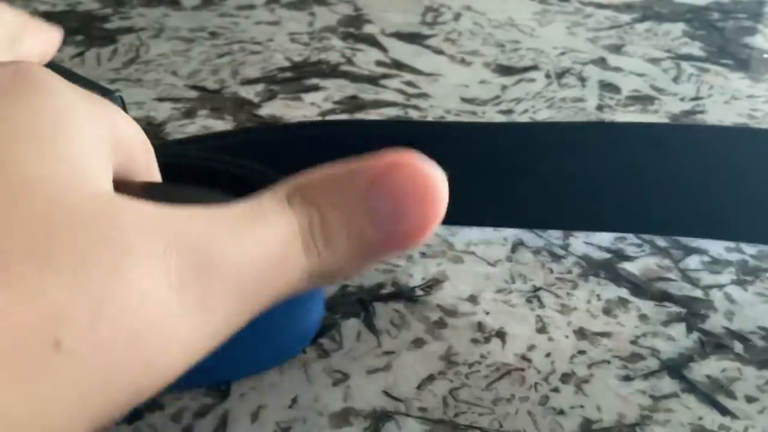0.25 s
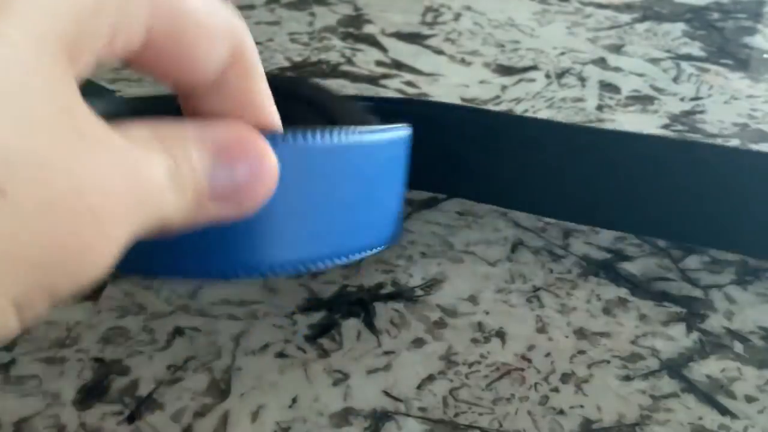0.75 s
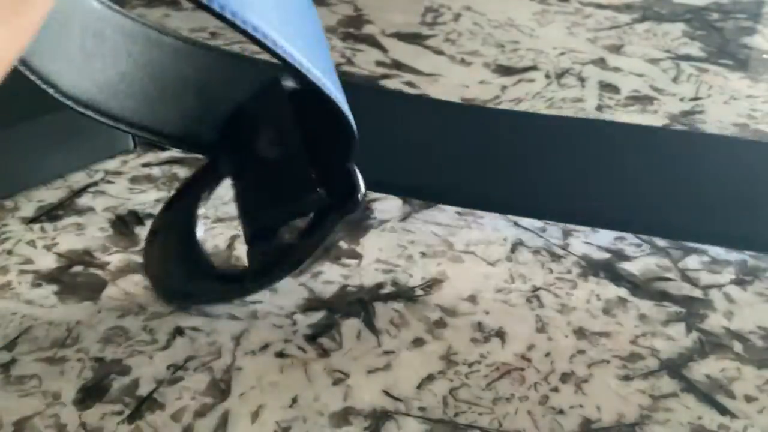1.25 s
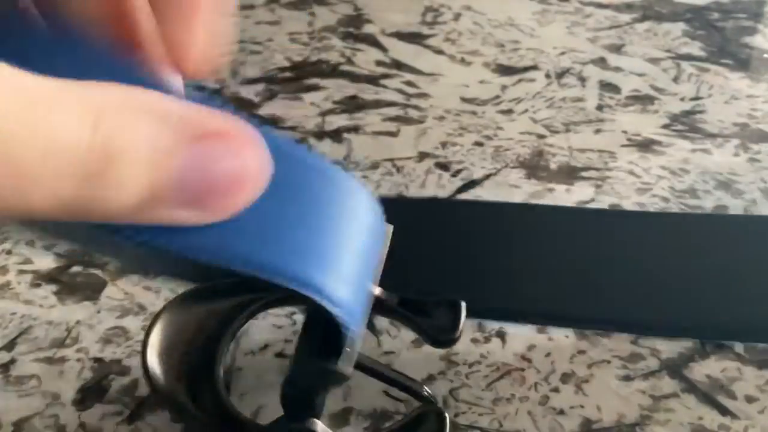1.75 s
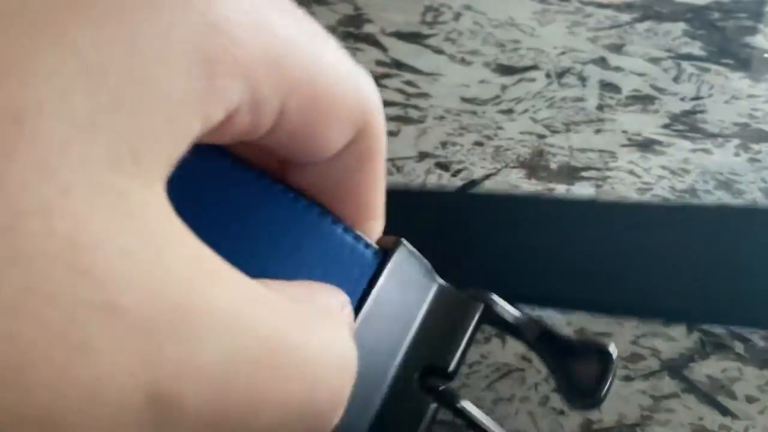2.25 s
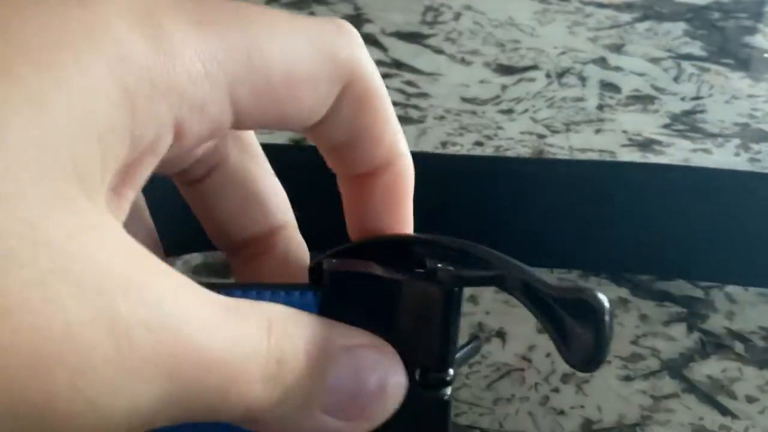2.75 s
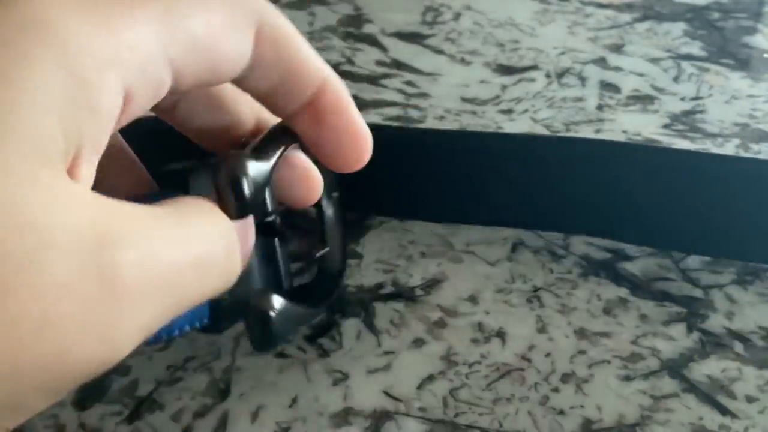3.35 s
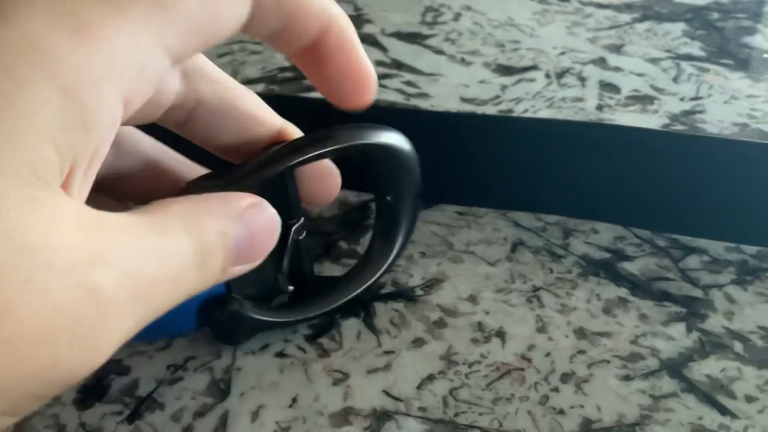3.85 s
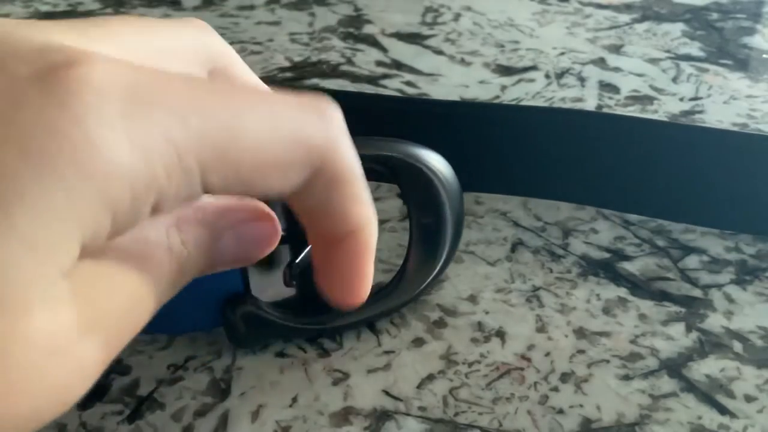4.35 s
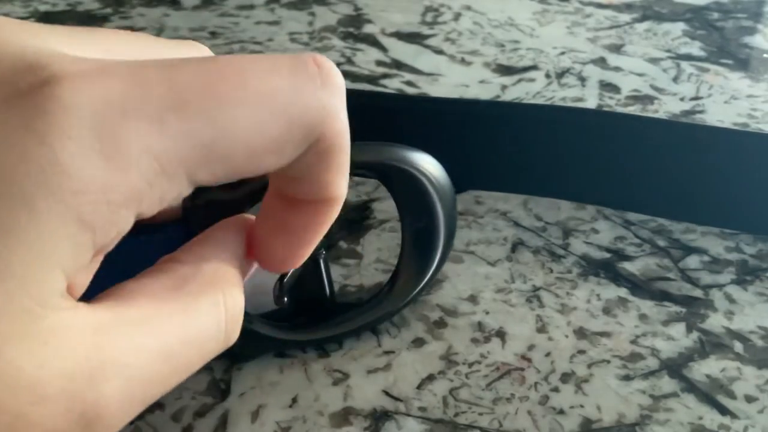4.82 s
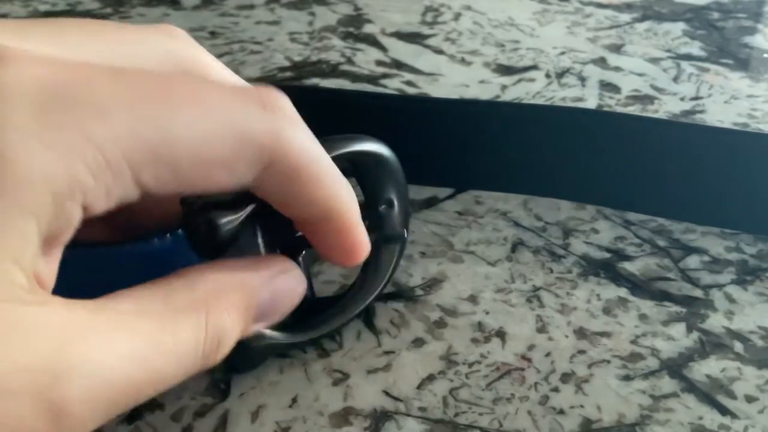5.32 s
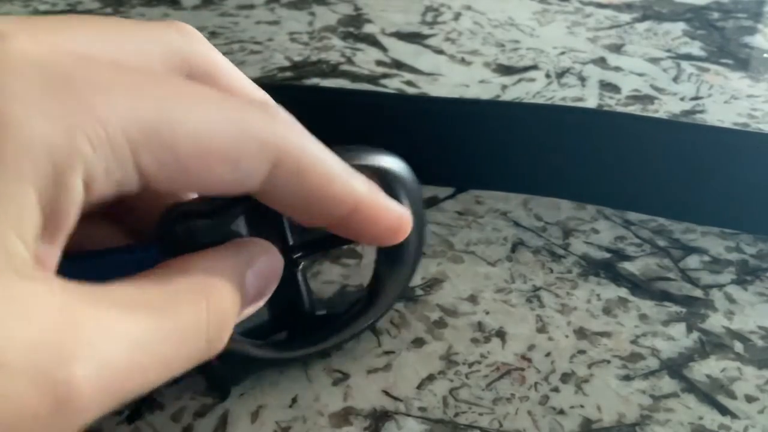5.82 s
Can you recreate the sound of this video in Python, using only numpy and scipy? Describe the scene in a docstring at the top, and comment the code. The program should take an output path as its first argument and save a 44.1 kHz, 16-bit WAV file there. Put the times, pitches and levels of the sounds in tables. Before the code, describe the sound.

Close up in a small, hard indoor room, hands uncoil a belt on a stone counter. Soft strap rustle leads to a quick cluster of buckle knocks, small hinge squeaks, then the loudest bright clacks and clinks. More separate hits and a rattling flurry follow before the handling thins to faint clicks over low ventilation.

```python
"""Stone countertop in a small hard room: hands uncoil a belt and turn its metal buckle over, close by.
Buckle blows and taps are noise bursts plus decaying modes; hinged parts clink and loose parts ping.
Hand and strap bump as band noise, the strap hisses as filtered noise and the stiff hinge chirps.
A diffuse tail with standing waves answers over steady ventilation noise and a faint tone."""
import sys
import numpy as np
from scipy import signal
from scipy.fft import rfft, irfft
from scipy.io import wavfile
from scipy.ndimage import uniform_filter1d, minimum_filter1d

SR = 44100
rng = np.random.default_rng(int(sys.argv[2]) if len(sys.argv) > 2 else 0)


def pcm_store(signal):
    """Save signal as 16-bit PCM."""
    levels = np.round(np.clip(np.atleast_2d(signal), -1, 1) * 32767)
    wavfile.write(sys.argv[1], SR, levels.astype(np.int16).T)


N = 268260

# buckle modes: part (0 frame low, 1 frame high, 2 crossbar, 3 hinged clamp), f/Hz, relative level/dB,
# nominal t60/s
BUCKLE_MODES = [(0, 2790, -14, .03), (0, 4410, 3, .026), (0, 4570, 4, .026), (0, 4750, -4, .075),
                (0, 5790, -8, .035), (0, 6030, -6, .03), (0, 6260, -7, .03), (0, 6745, 10, .035),
                (0, 6995, -1, .03), (0, 7280, -1, .028), (1, 8740, 4, .035), (1, 11280, 10, .033),
                (1, 12710, 6, .045), (1, 15380, -7, .04), (1, 10830, -2, .028), (1, 13060, -7, .025),
                (1, 14450, -8, .025), (2, 8710, 7, .075), (2, 8690, -17, .3), (2, 12690, -8, .15),
                (2, 4860, -14, .25), (3, 7655, 6, .11), (3, 10480, 9, .15), (3, 11350, -1, .08),
                (3, 15420, -3, .14)]
CLACK_SHARE = 0.62  # share of a light contact's bass weight that reaches the mids


def amp(db):
    """Amplitude ratio from dB."""
    return 10 ** (np.asarray(db) / 20)


def unit(x):
    """Scale to unit RMS."""
    return x / np.sqrt(np.mean(x ** 2) + 1e-20)


def read(points, hz):
    """Interpolate (f/Hz, value) points linearly over log frequency."""
    f, value = np.transpose(points)
    return np.interp(np.log(hz + 1), np.log(f + 1), value)


def add(mix, s, sound):
    """Add a sound into the mix at s seconds, cut at the end."""
    part = mix[max(round(s * SR), 0):][:len(sound)]
    part += sound[:len(part)]


def coloured(x, points):
    """Filter x, zero phase, by a (f/Hz, gain/dB) spectrum."""
    hz = np.fft.rfftfreq(len(x), 1 / SR)
    return irfft(rfft(x) * amp(read(points, hz)), len(x))


def causal(db, size=2048):
    """Minimum-phase impulse response from gains in dB on the FFT bins."""
    log_gain = np.log(amp(np.r_[db, db[-2:0:-1]]))
    spectrum = np.exp(np.conj(signal.hilbert(log_gain)))
    return irfft(spectrum[:size // 2 + 1])


def room_tone(level_db=-70, hum_db=-84, hum_hz=866):
    """Steady ventilation noise, shaped in spectrum, with one faint sine."""
    # ventilation spectrum: f/Hz, relative density/dB
    noise_spectrum = [(15, -62.5), (25, -20.5), (195, -8), (317, -14.5), (384, -7.5), (439, -17),
                      (641, -16), (754, -36), (863, -22), (1610, -44), (1790, -33.5), (16000, -37)]
    hum = np.sin(2 * np.pi * hum_hz * np.arange(N) / SR)
    noise = unit(coloured(rng.standard_normal(N), noise_spectrum))
    return amp(level_db) * noise + amp(hum_db) * hum


def room(x, delay_s=0.007, build_s=0.00067):
    """Reverberation: diffuse noise decaying at a rate set by frequency, plus a few standing waves."""
    # decay: f/Hz, t60/s
    decay_points = [(150, .5), (530, 0.54), (1400, 0.5952), (3500, .5), (7000, 0.59), (11000, 0.37),
                    (15000, 0.15)]
    # diffuse tail against the direct sound: f/Hz, level/dB
    tail_points = [(150, 2), (520, -2.5), (1100, -2.5), (2300, -7.5), (4500, -13), (7000, -20.5),
                   (11000, -22), (15000, -16)]
    # standing waves: f/Hz, level/dB, t60/s
    standing_waves = [(263.7, -63.5, 0.84), (502, -62, 0.26), (524, -64, 0.64), (619, -62, .45),
                      (810, -68, .5), (1524, -57.5, .55), (2040, -62, 0.28)]
    hz, t, bins = signal.stft(rng.standard_normal(SR), SR, nperseg=256)
    t60 = read(decay_points, hz)[:, None]
    gain = amp(read(tail_points, hz)[:, None] - 60 * t / t60)
    gain *= np.sqrt(2 * np.log(1000) / (t60 * SR))  # level independent of decay time
    tail = signal.istft(bins * gain, SR, nperseg=256)[1][:SR]
    t = np.arange(SR) / SR
    for mode_hz, db, mode_t60 in standing_waves:
        tail += amp(db - 60 * t / mode_t60) * np.sin(2 * np.pi * (mode_hz * t + rng.random()))
    onset = 1 - np.exp(-np.maximum(t - delay_s, 0) / build_s)
    return signal.fftconvolve(x, tail * onset)[:N]


def sliding(rise_s=.012, release_s=0.013, arch_db=0.5):
    """Hiss gains above and below the pressure corner: each stroke rises, arches and dies away."""
    # strap strokes over stone and skin: t/s, length/s, hiss level/dB, change over the stroke/dB,
    # pressure as gain below the corner/dB
    stroke_table = [(0, .41, -54, -13, 2.5), (.45, 0.29, -59.5, -7.5, 2), (0.598, 0.34, -55, -5.5, 2.5),
                    (0.97, 0.34, -49.5, -7.5, -6.5), (1.171, 0.3, -42, -10.5, 1),
                    (1.594, .18, -60.5, 7, 2.5), (1.797, 0.39, -72, -2.5, 4), (2.184, 0.19, -56.5, 1, -2.5),
                    (2.382, 0.14, -70.5, -4, 9), (2.538, 0.16, -57.5, 5, -12),
                    (2.793, 0.42, -59.5, -5, -2.5), (3.072, 0.34, -47, -16, 1), (3.778, 0.16, -71, 4.5, 2),
                    (4.497, 0.45, -86, -5.5, 11), (5.113, 0.32, -60, -17.5, 6.5),
                    (5.889, 0.17846, -82.5, -5.5, 10.5)]
    t, top, low = np.arange(SR) / SR, np.zeros(N), np.zeros(N)
    for s, length_s, db, change_db, press_db in stroke_table:
        along = np.minimum(t / length_s, 1)
        gain = amp(db + change_db * along + arch_db * np.sin(np.pi * along))
        gain *= np.minimum(t / rise_s, 1)
        gain *= np.exp(-np.maximum(t - length_s, 0) / release_s)
        add(top, s, gain)
        add(low, s, gain * amp(press_db))
    return top, low


def strap(snags_per_s=130, snag_db=-11, unevenness_db=0.3, press_hz=8500):
    """Friction hiss with tiny stitching snags; pressure sets the level below the corner."""
    # strap spectrum: f/Hz, gain/dB
    strap_spectrum = [(80, -16.5), (250, 2.5), (520, 1), (1000, -2), (1700, -0.5), (3200, 1), (8000, 0.5),
                      (12400, -2), (16000, -3)]
    top_gain, low_gain = sliding()
    snag_size = amp(3.2 * np.minimum(rng.exponential(1, N), 4))
    snags = (rng.random(N) < snags_per_s / SR) * snag_size
    scratch = rng.standard_normal(128) * np.exp(-np.arange(128) / 30)
    scratches = unit(signal.oaconvolve(snags, scratch)[:N])
    hiss = coloured(rng.standard_normal(N) + amp(snag_db) * scratches, strap_spectrum)
    lower = signal.sosfiltfilt(signal.butter(3, press_hz, fs=SR, output="sos"), hiss)
    uneven = unit(uniform_filter1d(rng.standard_normal(N), size=700))
    return ((hiss - lower) * top_gain + lower * low_gain) * amp(unevenness_db * uneven)


def rattle(per_s=18, over_slide_db=7, size_spread_db=2.5, ring_db=-14, tick_t60_s=0.015):
    """Loose parts tick at random, scaled by the strap's hiss gain, with a little modal ring."""
    motion, _ = sliding()
    t = np.arange(SR // 10) / SR
    _, hz, mode_db, t60 = np.transpose(BUCKLE_MODES)[:, :, None]
    out = np.zeros(N)
    for at in np.flatnonzero(rng.random(N) < per_s / SR):
        mode_level = amp(mode_db - 60 * t / t60) * rng.standard_normal(hz.shape)
        tones = (mode_level * np.sin(2 * np.pi * hz * t)).sum(0) / np.sqrt(len(hz))
        tick = rng.standard_normal(len(t)) * amp(-60 * t / tick_t60_s)
        level = motion[at] * amp(over_slide_db + size_spread_db * rng.standard_normal())
        add(out, at / SR, level * (tick + amp(ring_db) * tones))
    return out


def bumps(spread=1.27, swell_s=0.00054):
    """Hand and strap land softly: decaying band noise without ring."""
    # bumps on the stone: t/s, centre f/Hz, level/dB, t60/s
    bump_table = [(.463, 690, -46, 0.11), (.575, 710, -46.5, 0.34), (.645, 206, -47, 0.095),
                  (.659, 930, -33, 0.035), (.661, 138.7, -43, 0.11), (.719, 1040, -33.5, 0.027),
                  (.752, 800, -36, .055), (.756, 140, -46.5, .15), (1.775, 110, -50, .12),
                  (3.028, 165.8, -37.5, 0.075), (3.423, 268.8, -46.5, 0.11896), (3.699, 1490, -26.5, 0.018),
                  (3.983, 275, -55.5, 0.13), (3.98, 1400, -43.5, 0.048), (4.522, 789.7, -56, .15),
                  (4.696, 1304, -42, 0.045), (5.302, 1483, -50.5, 0.04), (5.392, 1264, -47.5, 0.045)]
    t, out = np.arange(SR // 3) / SR, np.zeros(N)
    for s, hz, db, t60 in bump_table:
        band = signal.butter(2, [hz / spread, hz * spread], "bandpass", fs=SR, output="sos")
        puff = unit(signal.sosfilt(band, rng.standard_normal(len(t))))
        add(out, s, puff * amp(db - 60 * t / t60) * (1 - np.exp(-t / swell_s)))
    return out


def squeaks(jitter=0.036, overtone_db=-15):
    """The stiff hinge sticks and slips: brief falling chirps with jittered pitch and an octave overtone."""
    # chirps: t/s, length/s, start f/Hz, end f/Hz, level/dB
    squeak_table = [(0.057, 0.013, 4200, 3400, -58), (0.825, 0.017, 3450, 3300, -48),
                    (.909, 0.017, 3050, 2750, -44.5), (0.923, 0.013, 2800, 2700, -54),
                    (1.004, 0.0041, 2950, 2750, -48), (1.009, .008, 2900, 2750, -50.5),
                    (3.251, 0.019, 1480, 1220, -49), (3.291, 0.017, 1550, 1350, -59)]
    out = np.zeros(N)
    for s, length_s, start_hz, end_hz, db in squeak_table:
        n = round(length_s * SR)
        wander = unit(uniform_filter1d(rng.standard_normal(SR // 10), size=30))[:n]
        hz = np.linspace(start_hz, end_hz, n) * (1 + jitter * wander)
        phase = 2 * np.pi * np.cumsum(hz) / SR
        chirp = np.sin(phase) + amp(overtone_db) * np.sin(2 * phase)
        add(out, s, amp(db) * unit(chirp * np.hanning(n)))
    return out


def pings():
    """Prong and pin ring freely: single decaying sines with a soft onset."""
    # pings: t/s, f/Hz, level/dB, t60/s, swell/s
    ping_table = [(4.161, 6590, -48.5, 0.61, 0.016), (4.161, 13020, -66.5, 0.34, 0.0095),
                  (0.315, 10870, -28, .03, .001), (5.207, 11000, -33.5, 0.046, 0.0028),
                  (5.391, 4800, -53, 0.35, 0.0008), (5.391, 12380, -20, 0.068, 0.0011),
                  (5.795, 4550, -49.5, 0.055, 0.00068)]
    t, out = np.arange(SR // 2) / SR, np.zeros(N)
    for s, hz, db, t60, swell_s in ping_table:
        envelope = amp(db - 60 * t / t60) * (1 - np.exp(-t / swell_s))
        add(out, s, envelope * np.sin(2 * np.pi * hz * t))
    return out


def contact(strength_db, weight_db, clack_db, bright_db,
            knock_t60_s=0.053, chatter_t60_s=0.018, rise_s=0.00012):
    """Metal chatters on stone: a coloured noise burst whose bass lasts longer."""
    # tone control corners, knock, clack, click, tick: f/Hz
    corner_hz = [550, 2100, 5800, 11500]
    # buckle on stone: f/Hz, gain/dB
    contact_spectrum = [(25, -36), (60, -23.5), (150, -12.5), (270, -2), (340, -8), (520, 5.5), (850, -2.5),
                        (1200, -2), (2000, 0.5), (2800, 3), (3600, 1.5), (7400, 1), (9900, -2.5),
                        (12700, -2.5), (15700, -10)]
    t, hz = np.arange(4096) / SR, np.fft.rfftfreq(2048, 1 / SR)
    noise = rng.standard_normal(len(t))
    low_pass = signal.butter(2, 1500, fs=SR, output="sos")
    low = signal.sosfiltfilt(low_pass, noise, padtype="even")
    burst = low * amp(-60 * t / knock_t60_s) + (noise - low) * amp(-60 * t / chatter_t60_s)
    burst *= 1 - np.exp(-t / rise_s)
    burst *= np.sqrt(SR / 100) / np.linalg.norm(burst)  # energy of unit RMS over 10 ms
    tone = list(zip(corner_hz, [weight_db, clack_db, 0, bright_db]))
    colour = causal(read(contact_spectrum, hz) + read(tone, hz))
    return amp(strength_db) * signal.fftconvolve(burst, colour)


def ring(parts_db, rise_s=.00037):
    """Four buckle parts ring as decaying modes; grip and strike point vary pitch, damping and share."""
    detune, damping_spread, strike_db = .003, .1, 1.5  # standard deviations: ratio, log ratio, dB
    t = np.arange(SR // 3) / SR
    part, hz, db, t60 = np.transpose(BUCKLE_MODES)[:, :, None]
    shift, grip, place, phase = rng.standard_normal((4, len(BUCKLE_MODES), 1))
    part_db = np.array(parts_db)[np.rint(part).astype(int)]
    decay_db = 60 * t / (t60 * np.exp(damping_spread * grip))
    level = amp(part_db + db + strike_db * place - decay_db)
    tones = level * np.sin(2 * np.pi * (hz * (1 + detune * shift) * t + phase))
    return tones.sum(0) * (1 - np.exp(-t / rise_s))


def taps(low_ring_db=-18, high_ring_db=-21, crossbar_db=-22, clamp_db=-38):
    """Fingers and held metal tap: single contacts, the gripped buckle hardly ringing."""
    # taps: t/s, strength/dB, bass weight/dB, top-treble brightness/dB (both against strength)
    tap_table = [(0.0567, -44.5, 4.5, -47), (.4632, -53, 18, -3), (0.671, -40.5, 5.5, 7),
                 (0.9896, -40, -43, -3), (1.012, -44, 3.5, -2), (1.1261, -53.5, 9.5, -12),
                 (1.3775, -44.5, -6.5, -11), (1.396, -53.5, 14.5, 0), (1.493, -45, 2.5, -16),
                 (1.53, -42.5, -16, -9), (1.582, -58.5, 5.5, 1), (2.2395, -43, -13.5, -6),
                 (2.284, -49, 4, -15), (2.4011, -43.5, -6, -21), (2.416, -55.5, 10.5, 2),
                 (2.49, -46, -7.5, -7), (2.6146, -42.5, -11, -23), (2.632, -42, 2, 0.5),
                 (2.8276, -59, 1.5, 3), (2.9567, -55, -0.5, -21), (3.04, -27, -1.5, -17),
                 (3.133, -55, 2, -8), (3.211, -52.5, -20, 1.5), (3.227, -41, -11, -4),
                 (3.335, -50, -9.5, -2), (3.3522, -44.5, -26, 2), (3.3756, -42, -17, -2),
                 (4.522, -54, 11.5, -0.5), (4.529, -59, 10, -12.5), (4.682, -57, 10, -15.5),
                 (4.696, -52, 8, -9.5), (4.709, -49, -0.5, -10.5), (4.7342, -58.5, -0.5, -1.5),
                 (4.873, -68, 16, -20.5), (5.301, -54, 4, -3), (5.7959, -59, -5.5, -23),
                 (6.062, -51, -13.5, -3)]
    out = np.zeros(N)
    for s, db, weight_db, bright_db in tap_table:
        add(out, s, contact(db, weight_db, CLACK_SHARE * weight_db, bright_db, chatter_t60_s=.022))
        add(out, s, ring(db + np.array([low_ring_db, high_ring_db, crossbar_db, clamp_db])))
    return out


def clinks(tick_db=-8, weight_db=-15, bright_db=1, frame_db=-17):
    """Hinged parts swing against their stops: a thin tick, crossbar and clamp ring, little frame."""
    # clinks: t/s, crossbar ring level/dB, clamp ring level/dB
    clink_table = [(0.317, -47.5, -57), (.7697, -42, -56), (1.2075, -62.5, -40), (1.3342, -29, -48),
                   (1.411, -40.5, -32), (2.304, -84.5, -63), (3.21, -50.5, -65), (3.2399, -38.5, -49),
                   (3.26, -46, -80), (3.305, -42, -57)]
    out = np.zeros(N)
    for s, crossbar_db, clamp_db in clink_table:
        db = max(crossbar_db, clamp_db)
        add(out, s, contact(db + tick_db, weight_db, CLACK_SHARE * weight_db, bright_db))
        add(out, s, ring([db + frame_db, db + frame_db, crossbar_db, clamp_db]))
    return out


def blows():
    """The buckle lands and rebounds once; both contacts ring the whole buckle."""
    # blows: t/s, strength/dB, then against strength: bass weight/dB, mid clack/dB,
    # top-treble brightness/dB, ring/dB; rebound delay/s
    blow_table = [(0.218, -42.5, 11, 9.5, 0, -9.5, 0.0039183), (.3164, -68, 22, 7, 20, -14, .001),
                  (.612, -22.5, -1, -8.5, -5, -9.5, 0.007147), (0.639, -26.5, -11, -2, -6, -13, 0.0023),
                  (0.653, -46, 4, 8, -7, 10, 0.0018), (0.658, -28, 5, 3.5, -10.5, -15, 0.0025),
                  (.7183, -38.5, -10, -23, -7.5, -26, 0.0025), (0.7455, -26, -18, -15, -19, -23, .001),
                  (0.7505, -21, -7, -10.5, -4, -8.5, 0.0018), (0.77, -35, -15, -1.5, -17, -0.5, 0.0019),
                  (1.1565, -46, -18.5, -12, 1.5, 0.5, .002),
                  (1.1793, -12.5, -16.5, -4.5, -2.5, -3.5, .0025), (1.2075, -28, -1, -9, -8.5, -26, 0.0031),
                  (1.2442, -34, -14.5, 4, 8, -9, 0.0025), (1.326, -27, -12.5, -8.5, 14, -20, .0026),
                  (1.774, -31.5, -7.5, -3.5, -22.5, -43, .0005), (1.937, -17.5, -11.5, -6, -2, 0.5, 0.0033),
                  (2.087, -13.5, -15, -10, -1.5, -7, 0.0016),
                  (2.5289, -28.5, -20, -6.5, -15.5, -14.5, .0015), (3.0251, -15, -10.5, -1, 0, -1, .003),
                  (3.1058, -46, -14.5, 11, 20.5, -7, 0.0037), (3.2392, -31, -39, -40, 1.5, -11, 0.0052),
                  (3.4211, -27.5, 1.5, 6, -2.5, -2.5, .006), (3.698, -19.5, -21, -16, 4, -26, 0.0012),
                  (3.7299, -31, 1, -13, -11.5, -24, .006), (3.9796, -42.5, 6, 0.5, 8, -11, 0.00066),
                  (4.16, -38.5, -16.5, -11.5, 0.5, -25, .001), (5.3766, -40, -9.5, -6, 20.5, -9, 0.0024),
                  (5.3897, -32, -14.5, -11, 17, -13, 0.0052), (6.0445, -41.5, -13.5, -16, -4, -9, 0.0031)]
    first_db, first_ring_db = -2.67, -3
    rebound_db, rebound_ring_db, rebound_weight_db = -6.5, -3.5, 4.5  # weaker, with more body
    high_modes_db, crossbar_db, clamp_db = -2.5, -8.5, -24.5  # against the frame's low modes
    high_per_brightness = 0.96  # dB per dB: a sharper blow favours the high modes
    chatter_t60_s, chatter_per_rebound = 0.005, 6.6  # s, s per s: a late rebound chatters longer
    out = np.zeros(N)
    for s, db, weight_db, clack_db, bright_db, ring_db, rebound_s in blow_table:
        high_db = high_modes_db + high_per_brightness * bright_db
        parts_db = db + ring_db + np.array([0, high_db, crossbar_db, clamp_db])
        chatter_s = chatter_t60_s + chatter_per_rebound * abs(rebound_s)
        landing = contact(db + first_db, weight_db, clack_db, bright_db, chatter_t60_s=chatter_s)
        add(out, s, landing)
        add(out, s, ring(parts_db + first_ring_db))
        rebound = contact(db + rebound_db, weight_db + rebound_weight_db, clack_db, bright_db,
                          chatter_t60_s=chatter_s)
        add(out, s + rebound_s, rebound)
        add(out, s + rebound_s, ring(parts_db + rebound_ring_db))
    return out


def scene():
    """Belt and buckle, their room response and the room tone; one channel."""
    belt = strap() + rattle() + bumps() + squeaks()
    buckle = pings() + taps() + clinks() + blows()
    near = belt + buckle
    return (near + room(near) + room_tone())[None]


def record(dry, low_cut_hz=66, ceiling=.9, edge_hz=15950):
    """Low cut, fast peak limiter, then band limit."""
    high_pass = signal.butter(2, low_cut_hz, "highpass", fs=SR, output="sos")
    thinned = signal.sosfilt(high_pass, dry)
    gain = minimum_filter1d(ceiling / np.maximum(abs(thinned), ceiling), size=31)
    limited = thinned * uniform_filter1d(gain, size=31)
    band_limit = signal.firwin(201, edge_hz, window=("kaiser", 9), fs=SR)
    return signal.oaconvolve(limited, band_limit[None], "same")


dry = scene()
out = record(dry)
pcm_store(out)
```